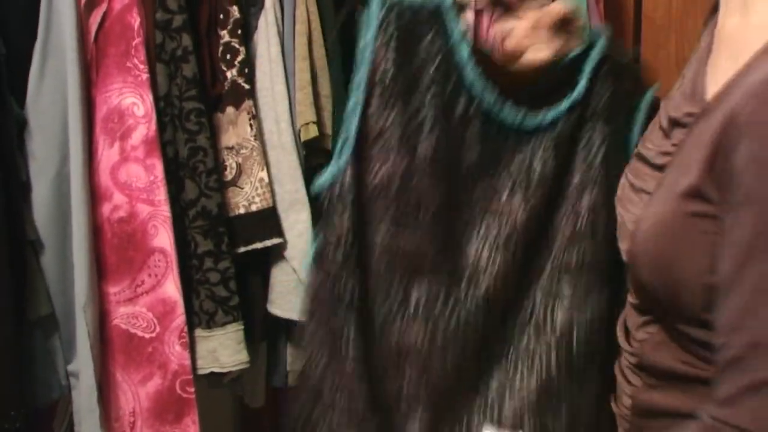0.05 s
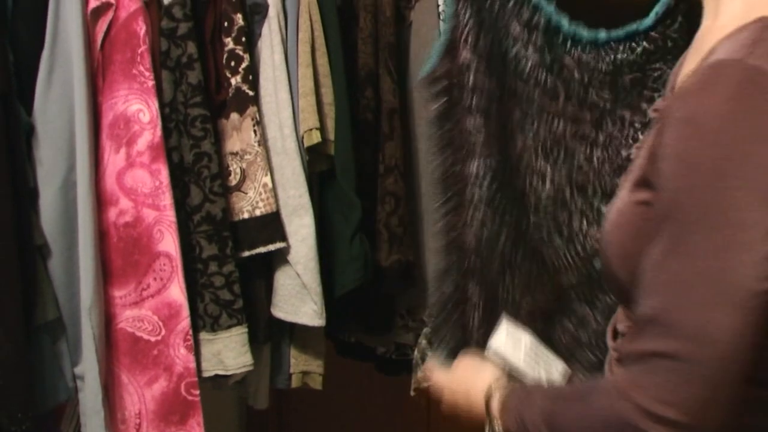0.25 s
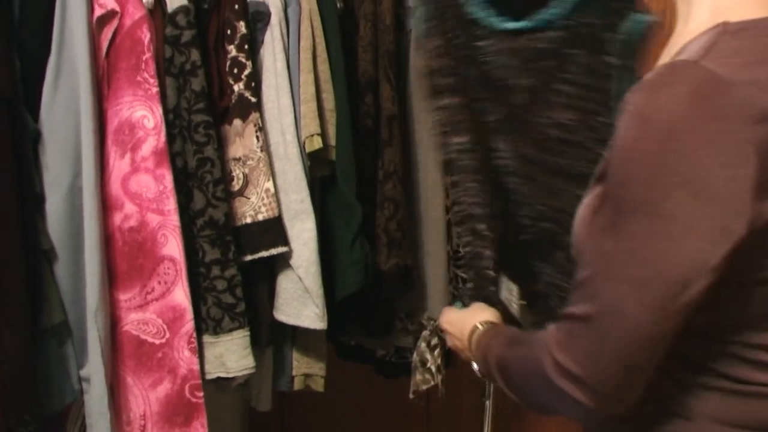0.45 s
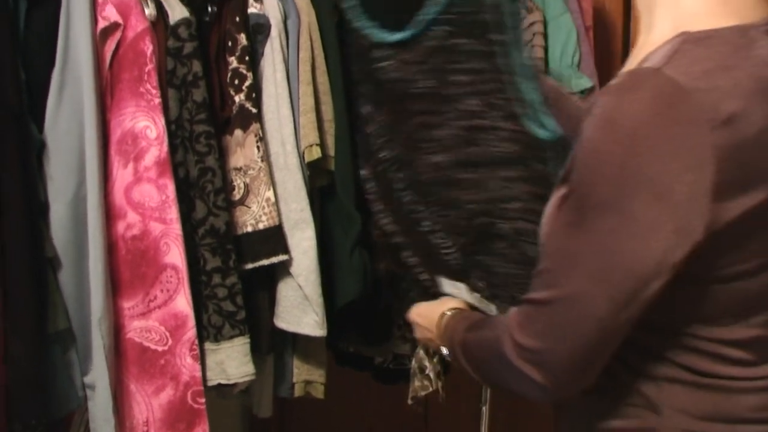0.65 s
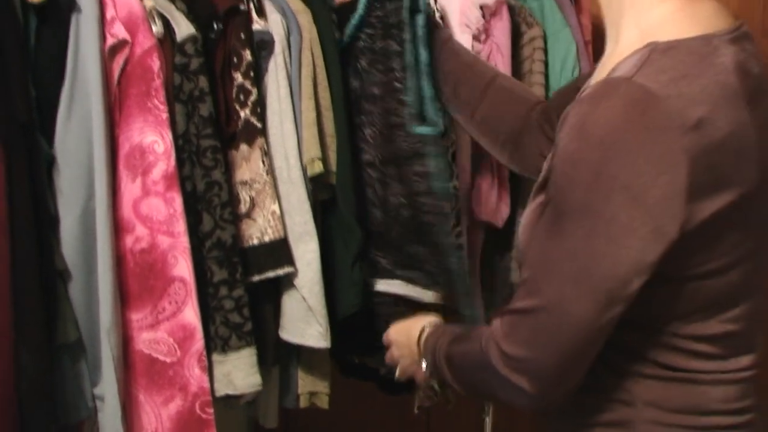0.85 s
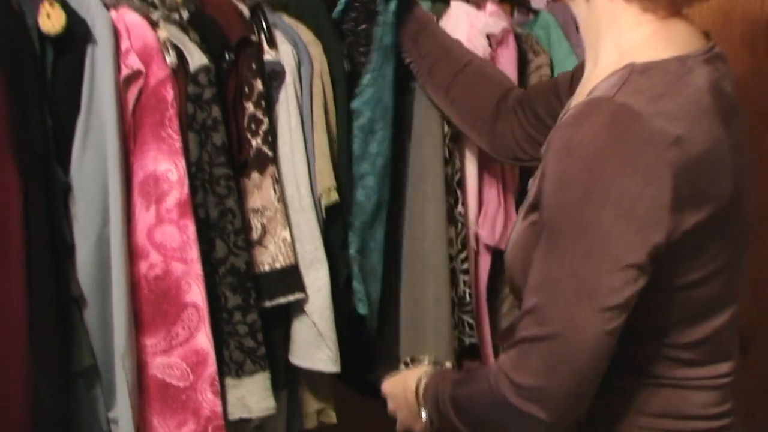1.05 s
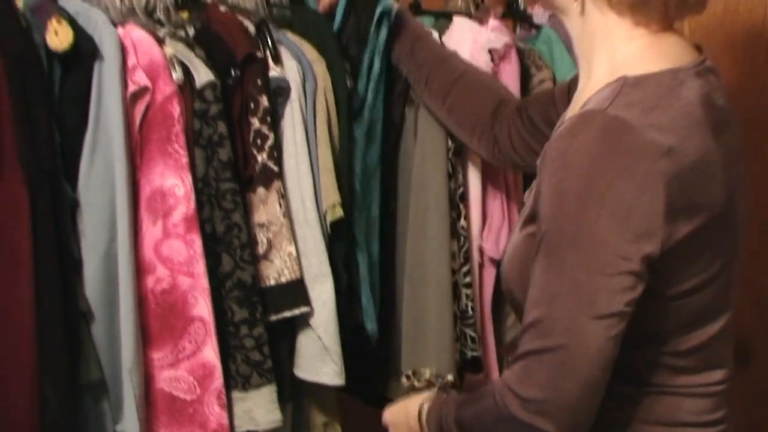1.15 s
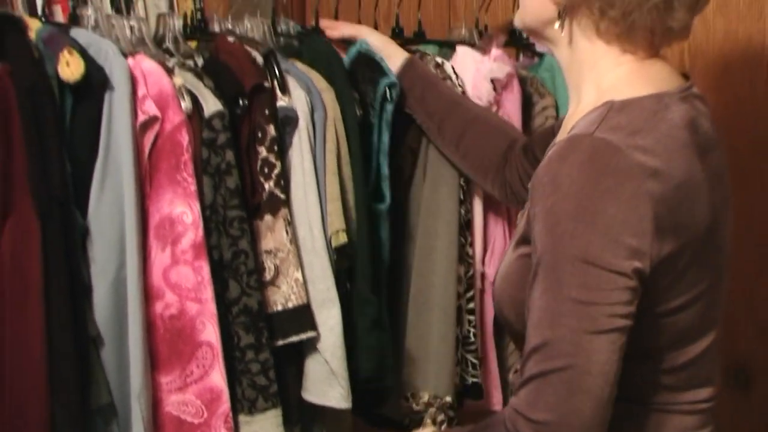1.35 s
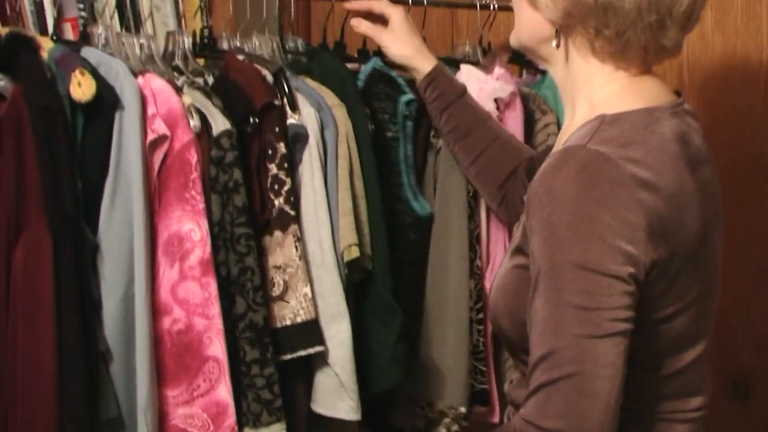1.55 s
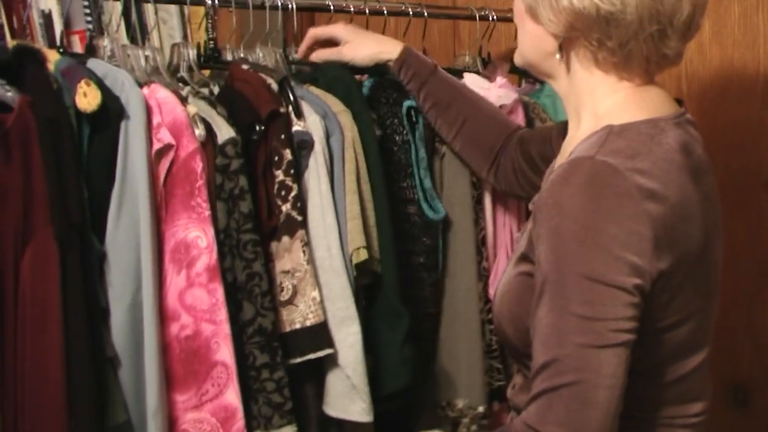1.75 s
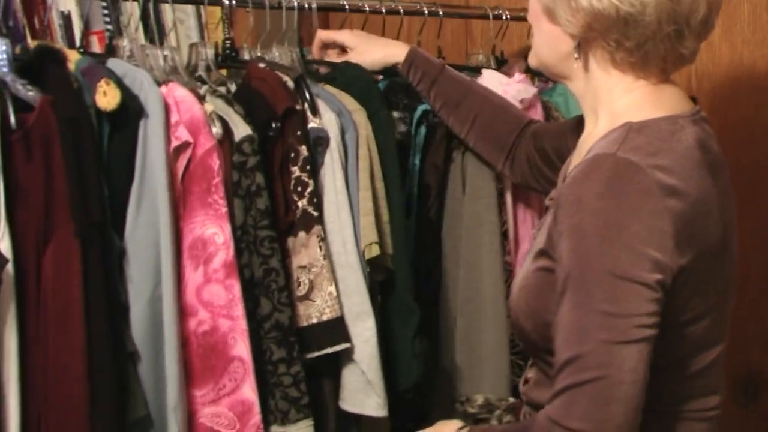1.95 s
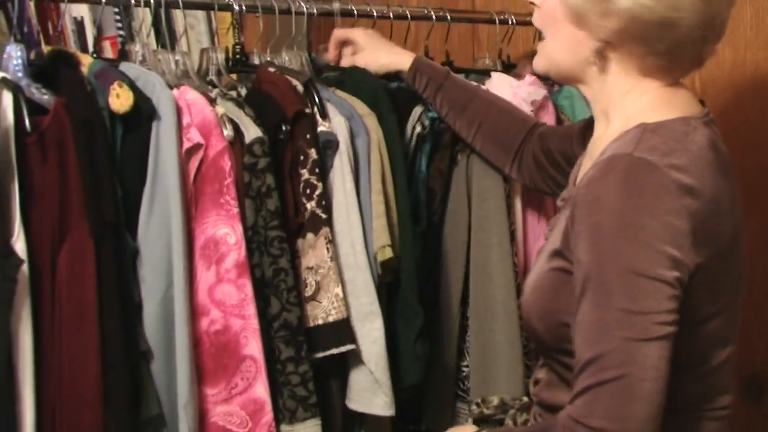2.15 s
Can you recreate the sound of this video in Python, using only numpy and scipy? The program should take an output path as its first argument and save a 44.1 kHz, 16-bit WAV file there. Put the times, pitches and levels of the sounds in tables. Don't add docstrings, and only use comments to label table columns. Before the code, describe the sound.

A steel hanger hook clatters sharply onto a metal rail and bounces once, after a soft sleeve thud and faint ticks; lighter hanger clicks follow, in a small furnished room, close stereo microphone with light hiss.

```python
import sys
import numpy as np
from scipy import signal
from scipy.fft import rfft, irfft
from scipy.io import wavfile
from scipy.ndimage import uniform_filter1d

SR = 44100
rng = np.random.default_rng(int(sys.argv[2]) if len(sys.argv) > 2 else 0)


def wrap_up_sound(samples):
    columns = np.atleast_2d(samples).T
    tamed = np.clip(columns, -1, 1)
    steps = np.round(tamed * 32767).astype(np.int16)
    wavfile.write(sys.argv[1], SR, steps)


def gain_from_db(level_db):
    decades = np.asarray(level_db, float) / 20
    return 10 ** decades


N = 97372

# f/Hz, width/Hz, level/dB
DROP_CLUSTERS = [(644, 210, -16), (376, 330, -18.5), (1480, 340, -15), (1900, 300, -11), (2700, 700, -8),
                 (3950, 900, -2.5), (5000, 870, -2.5), (6930, 1370, 1.5), (7740, 230, -5),
                 (9000, 1050, -4.5), (10500, 2200, -4), (12700, 1900, -0.5), (13700, 720, -12),
                 (15300, 900, -2)]
BOUNCE_CLUSTERS = [(713, 240, -14.5), (1440, 210, -18.5), (2040, 340, -15), (2760, 400, -4),
                   (3400, 400, -5.5), (4150, 460, 1), (4900, 560, -4.5), (6250, 390, -2.5), (7360, 690, -9),
                   (9000, 2700, -7.5), (11800, 520, 1.5), (12600, 700, -2.5), (14400, 300, -14),
                   (15350, 200, -9)]
# f/Hz, level/dB, t60/s
DROP_MODES = [(780, -12.5, 0.28), (1890, -16, 0.19), (2650, -10, 0.12), (4123, -1, 0.25), (4340, -12, 0.4),
              (4926, -8, 0.2), (5335, -12, 0.13), (6520, -8, 0.15), (6763, -8, .2), (7220, -5, 0.35),
              (7466, -6, 0.22), (7836, -6, .23), (11590, -4, .15), (12575, -5, 0.13)]
BOUNCE_MODES = [(692, -16, 0.16), (2182, -5.5, 0.08), (2682, -15, 0.3), (2813, -4, 0.09), (3493, -9, 0.14),
                (4127, -4, 0.22), (4251, -2, 0.24), (4210, -12, 0.5), (4900, -12, .2), (6250, -14, 0.18),
                (7730, -16, 0.22), (11620, -3, 0.16), (11820, -4, 0.16), (12620, -9, 0.19)]
# t/s, level/dB
DROP_CHATTER = [
    (1.2325, -16),
    (1.2345, -15),
    (1.2376, -14),
    (1.2404, -15),
    (1.2455, -13),
    (1.2540, -20),
    (1.2585, -19),
]
BOUNCE_CHATTER = [
    (1.3527, -20),
    (1.3553, -18),
    (1.3650, -18),
    (1.3770, -23),
]
# f/Hz, t60/s
CLATTER_T60 = [(300, 0.39), (2000, 0.28), (8000, 0.23), (15700, 0.16), (16000, 0.035)]
# f/Hz, level/dB, t60/s
FRAME_MODES = [(172.8, -5, 0.25), (200, -10, .3), (232, -14, 0.25), (331, -12, 0.29), (434, 2, 0.28),
               (626.5, 3, .15), (1190, -4, 0.33), (1334, -3, 0.46)]
# t/s, level/dB, centre f/Hz, width/Hz, t60/s
TICKS = [(.03, -67.5, 11000, 1500, .3), (.03, -70, 7500, 600, .3), (0.173, -59.5, 4000, 5000, 0.088),
         (.385, -65, 6200, 1200, 0.068), (0.537, -58, 4500, 5000, 0.01), (.541, -56, 3300, 3200, 0.03),
         (.540, -57.5, 6000, 12000, 0.14), (.852, -58, 9000, 12000, 0.23), (0.894, -57, 7000, 14000, 0.22),
         (.914, -57, 4500, 5000, 0.035), (1.653, -54, 8700, 10800, 0.12), (1.659, -53, 9600, 10900, 0.11),
         (1.657, -63.5, 2100, 400, 0.13), (1.692, -58, 9000, 9000, 0.091), (1.728, -47.5, 3750, 1100, 0.22),
         (1.749, -56, 3600, 900, .25), (1.740, -57, 1610, 500, 0.36), (1.7349, -53, 8000, 11000, 0.024),
         (1.790, -58, 3400, 1800, 0.35), (1.76, -63, 6000, 7000, .5), (1.797, -62.5, 7600, 900, 0.26),
         (1.815, -64, 12800, 3000, .15), (1.8464, -48.5, 10500, 9000, 0.05), (1.848, -58, 12300, 700, .15),
         (1.848, -52.5, 7950, 13000, 0.28)]
# t/s, peak level/dB, f/Hz, t60/s
SNAPS = [(.5367, -38, 3600, .003), (.5368, -46, 7000, .003), (.5406, -38, 3500, .004),
         (.5407, -46, 6300, .004), (.5420, -46, 2400, .008), (1.2325, -13.5, 5800, .0025),
         (1.2326, -18, 10800, .002), (1.7281, -41, 3800, .025), (1.7355, -40, 3900, .012),
         (1.7357, -46, 10000, .003), (1.8005, -48, 3300, .01), (1.815, -53, 5300, .008),
         (.2383, -36, 1900, .004)]
# t/s, level/dB, t60/s
THUDS = [
    (0.2296, -44, 0.24),
    (.2335, -47, .03),
    (.238, -42, 0.02),
    (.247, -49, 0.07),
    (.262, -49, 0.1),
    (.276, -49, 0.05),
    (0.294, -55, 0.14),
    (.325, -60, .15),
    (.405, -61, 0.43),
]
# f/Hz, level/dB
THUD_COLOUR = [(90, -45), (150, -16), (640, -1), (1400, -5), (2000, -12), (2740, -12), (3900, -23),
               (14000, -34)]
# f/Hz, level/dB, t60/s
THUD_MODES = [(170, -52, 0.15), (235, -47, 0.17), (301, -51, 0.26), (570.5, -50.5, 0.21),
              (650, -51.5, 0.22)]
# start t/s, length/s, level/dB
RUSTLES = [
    (.01, 0.15, -66),
    (0.358, 0.11, -73),
    (0.839, 0.13, -70.5),
    (1.78, 0.14, -66),
]
# f/Hz, level/dB
CLOTH_COLOUR = [(300, -7), (2000, 4.5), (6000, -7), (15000, -15)]
# f/Hz, level/dB
TONE_COLOUR = [(15, -67), (25, -34), (102, -8), (261, -6), (403, -5.5), (812, -5), (2030, -7.5), (2890, -8),
               (15800, -20)]
# f/Hz, width/Hz, level over tone/dB
ROOM_HUM = [(740, 60, 5), (1710, 40, 4), (2840, 40, 2)]
# f/Hz, likeness/1
TONE_ALIKE = [(100, 0.17), (1000, 0.1), (10000, 0.14)]
# f/Hz, likeness/1
HIT_ALIKE = [(300, 0.95), (1000, 0.84), (2500, 1), (5000, 0.46), (14000, 0.27)]

DROP_S, DROP_DB, DROP_RING_DB = 1.2300, -22, -13
BOUNCE_S, BOUNCE_DB, BOUNCE_RING_DB = 1.3500, -25.5, -5.5
RISE_S, SLOW_RISE_S = 0.0008, 0.003
CONTACT_T60_S, CONTACT_BAND_HZ = 0.002, [2600, 14500]
RING_BLUR_HZ = 24
SWAY_S, SWAY_DB, SWAY_SWELL_S = 1.240, -43.5, 0.045
GRAZE_S, GRAZE_HZ, GRAZE_DB, GRAZE_T60_S = 1.516, 4210, -61, 0.4
SLIDE_S, SLIDE_LENGTH_S, SLIDE_DB = 0.015, 0.115, -58.5
SLIDE_FROM_HZ, SLIDE_TO_HZ, SLIDE_WIDTH_HZ = 2300, 1950, 520
TONE_DB, TONE_PATCH_DB = -59, 1.03
LUMP_DB, LUMP_HZ = 1.5, 250
LINE_DB, LINE_HZ = 3.5, 25
TOP_HZ, LOW_HZ = 15800, 45
SNAP_LOW_HZ, THUD_LOW_HZ = 1400, 100


def unit(x):
    return x / np.sqrt(np.mean(x ** 2) + 1e-20)


def along(points, hz):
    point_hz, values = np.transpose(points)
    return np.interp(np.log(hz + 1), np.log(point_hz + 1), values)


def add(track, s, sound):
    part = track[:, round(s * SR):][:, :sound.shape[1]]
    part += sound[:, :part.shape[1]]


def above(x, hz):
    return signal.sosfilt(signal.butter(N=3, Wn=hz, btype="high", fs=SR, output="sos"), x)


def pair(size, gain, alike):
    hz = np.fft.rfftfreq(size, 1 / SR)
    turn = np.arccos(np.clip(along(alike, hz), -1, 1)) / 2
    spectrum = rfft(rng.standard_normal((2, size))) * gain(hz)
    mid, side = irfft(spectrum * [np.cos(turn), np.sin(turn)], size)
    return unit(np.array([mid + side, mid - side]))


def clusters(points):
    return lambda f: np.sqrt(sum(gain_from_db(2 * db) / (1 + (2 * (f - hz) / width_hz) ** 2) ** 2
                                 for hz, width_hz, db in points))


def lumpy(gain, lump_db=LUMP_DB, lump_hz=LUMP_HZ, top_hz=TOP_HZ):
    knots = rng.standard_normal(1200)

    def bumped(f):
        bumps_db = lump_db * np.interp(f / lump_hz, np.arange(1200), knots)
        return gain(f) * gain_from_db(bumps_db) * (f < top_hz)
    return bumped


def burst(gain, t60_s, rise_s=0.00031):
    t = np.arange(SR // 2) / SR
    envelope = gain_from_db(-60 * t / max(t60_s, 0.001)) * (1 - np.exp(-t / rise_s))
    return pair(len(t), lumpy(gain), HIT_ALIKE) * envelope


def ring(modes, rise_s, blur_hz):
    t = np.arange(SR) / SR
    out = np.zeros((2, SR))
    for hz, db, t60_s in modes:
        knots = rng.standard_normal((2, 2, 200))
        for side, (real_knots, imag_knots) in zip(out, knots):
            real = np.interp(t * blur_hz * 2, np.arange(200), real_knots)
            imag = np.interp(t * blur_hz * 2, np.arange(200), imag_knots)
            wander = 0.8 + 0.7 * (real + 1j * imag)
            side += gain_from_db(db - 60 * t / t60_s) * np.real(wander * np.exp(2j * np.pi * hz * t))
    return out * (1 - np.exp(-t / rise_s))


def room_tone():
    def gain(f):
        hum_db = sum(db / (1 + (2 * (f - hz) / width_hz) ** 2) for hz, width_hz, db in ROOM_HUM)
        return gain_from_db(along(TONE_COLOUR, f) + hum_db) * (f < TOP_HZ)
    z = signal.stft(pair(N, gain, TONE_ALIKE), nperseg=512)[2]
    patches = uniform_filter1d(rng.standard_normal(z.shape[1:]), size=8, axis=0)
    patches = unit(uniform_filter1d(patches, size=12, axis=1))
    return gain_from_db(TONE_DB) * signal.istft(z * gain_from_db(TONE_PATCH_DB * patches), nperseg=512)[1][:, :N]


def rustles():
    out = np.zeros((2, N))
    for s, length_s, db in RUSTLES:
        grain = gain_from_db(uniform_filter1d(rng.standard_normal(SR // 4), size=130) * 41)
        progress = np.minimum(np.arange(SR // 4) / (length_s * SR), 1)
        swell = np.sin(np.pi * progress ** 0.57)
        noise = pair(SR // 4, lumpy(lambda f: gain_from_db(along(CLOTH_COLOUR, f))), HIT_ALIKE)
        add(out, s, gain_from_db(db) * swell * grain * noise)
    return out


def slide():
    progress = np.minimum(np.arange(SR // 4) / (SLIDE_LENGTH_S * SR), 1)
    near = [(1000, 0.7)]  # (Hz, likeness)
    a, b = (pair(len(progress), lambda f: np.exp(-(2 * f / SLIDE_WIDTH_HZ) ** 2), near) for _ in range(2))
    phase = 2 * np.pi * np.cumsum(SLIDE_FROM_HZ + (SLIDE_TO_HZ - SLIDE_FROM_HZ) * progress) / SR
    swell = np.sin(np.pi * progress) ** 0.7 * (progress < 1)
    out = np.zeros((2, N))
    add(out, SLIDE_S, gain_from_db(SLIDE_DB) * swell * (a * np.cos(phase) + b * np.sin(phase)))
    return out


def hangers():
    out = np.zeros((2, N))
    for s, db, hz, width_hz, t60_s in TICKS:
        add(out, s, gain_from_db(db) * burst(lambda f: np.exp(-2 * ((f - hz) / width_hz) ** 2), t60_s))
    return out


def sleeve_thuds():
    out = np.zeros((2, N))
    for s, db, t60_s in THUDS:
        add(out, s, gain_from_db(db) * burst(lambda f: gain_from_db(along(THUD_COLOUR, f)), t60_s))
    first_s = THUDS[0][0]
    add(out, first_s, ring(THUD_MODES, rise_s=0.0027, blur_hz=24))
    return out


def snaps():
    out = np.zeros((2, N))
    t = np.arange(SR // 20) / SR
    for s, db, hz, t60_s in SNAPS:
        snap = gain_from_db(db - 60 * t / t60_s) * np.sin(2 * np.pi * hz * t)
        add(out, s, np.tile(snap, (2, 1)))
    return out


def clatter(colour):
    body = clusters(colour)
    gain = lumpy(lambda f: body(f) + gain_from_db(-24.5) * (f > 500), LINE_DB, LINE_HZ, TOP_HZ + 1200)
    hz, t, z = signal.stft(pair(SR // 2, gain, HIT_ALIKE), SR, nperseg=256)
    rise = 1 - np.exp(-(t + RISE_S) * (hz[:, None] / 1000) ** 2 / SLOW_RISE_S)
    decay = gain_from_db(-60 * t / along(CLATTER_T60, hz)[:, None])
    x = signal.istft(z * rise * decay, SR, nperseg=256)[1]
    return x * (1 - np.exp(-np.arange(x.shape[1]) / SR / RISE_S))


def hook_blow(s, db, ring_db, colour, modes, chatter):
    out = np.zeros((2, N))
    add(out, s, gain_from_db(db) * clatter(colour))
    add(out, s, gain_from_db(db + ring_db) * ring(modes, RISE_S, RING_BLUR_HZ))
    contact_band = signal.butter(N=3, Wn=CONTACT_BAND_HZ, btype="band", fs=SR, output="sos")
    for contact_s, contact_db in chatter:
        contact = burst(clusters(colour), CONTACT_T60_S, rise_s=RISE_S / 20)
        add(out, contact_s, gain_from_db(contact_db) * signal.sosfilt(contact_band, contact))
    return out


def hook():
    drop = hook_blow(DROP_S, DROP_DB, DROP_RING_DB, DROP_CLUSTERS, DROP_MODES, DROP_CHATTER)
    bounce = hook_blow(BOUNCE_S, BOUNCE_DB, BOUNCE_RING_DB, BOUNCE_CLUSTERS, BOUNCE_MODES, BOUNCE_CHATTER)
    return drop + bounce


def frame_sway():
    out = np.zeros((2, N))
    add(out, SWAY_S, gain_from_db(SWAY_DB) * ring(FRAME_MODES, SWAY_SWELL_S, blur_hz=5))
    return out


def hook_graze():
    out = np.zeros((2, N))
    mode = (GRAZE_HZ, GRAZE_DB, GRAZE_T60_S)
    add(out, GRAZE_S, ring([mode], rise_s=0.0024, blur_hz=2 * RING_BLUR_HZ))
    return out


def scene():
    impacts = hangers() + hook() + frame_sway() + hook_graze()
    garments = rustles() + sleeve_thuds()
    bodies = above(impacts + garments, THUD_LOW_HZ)
    return room_tone() + slide() + bodies + above(snaps(), SNAP_LOW_HZ)


def low_pass(x):
    return signal.sosfilt(signal.butter(12, 17060, fs=SR, output="sos"), x)


def record(dry):
    hz = np.fft.rfftfreq(N, 1 / SR)
    bass_cut = (1j * hz / (LOW_HZ + 1j * hz)) ** 2
    return low_pass(irfft(rfft(dry) * bass_cut, N))


dry = scene()
out = record(dry)
wrap_up_sound(out)
```